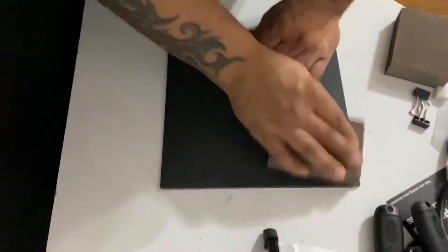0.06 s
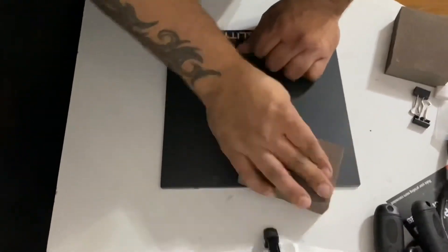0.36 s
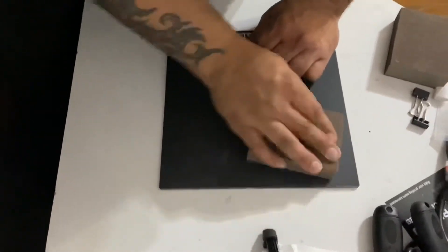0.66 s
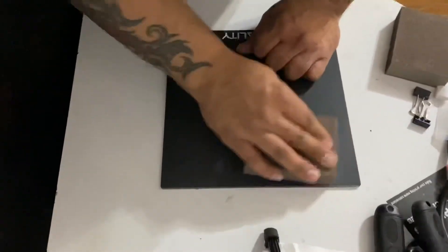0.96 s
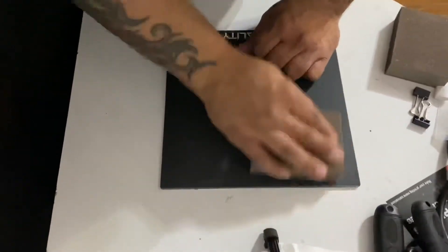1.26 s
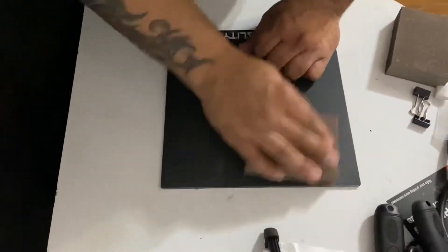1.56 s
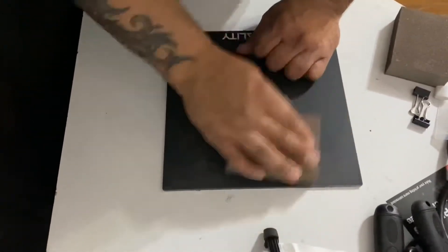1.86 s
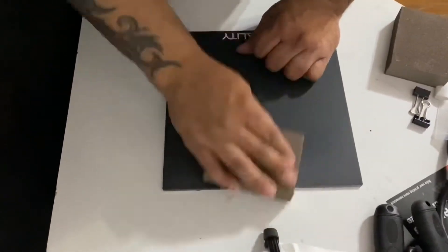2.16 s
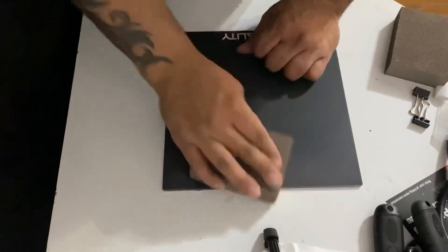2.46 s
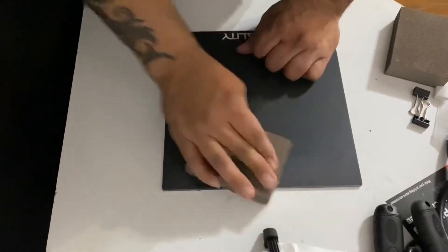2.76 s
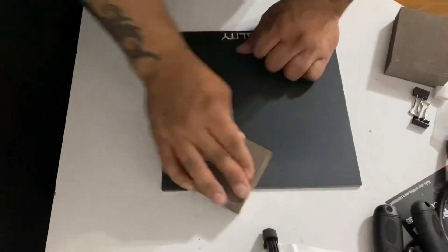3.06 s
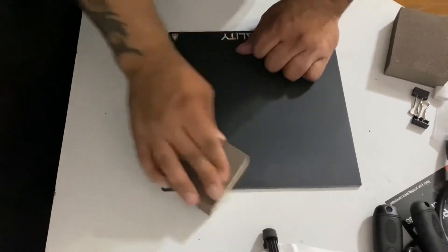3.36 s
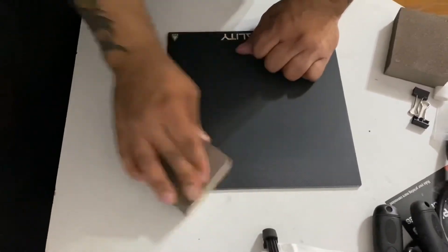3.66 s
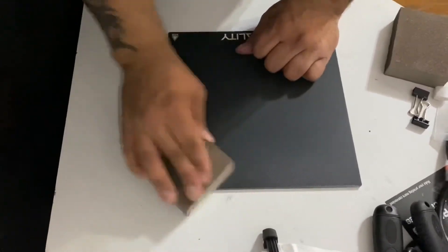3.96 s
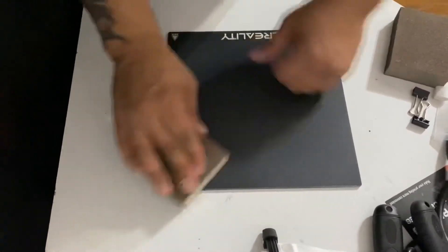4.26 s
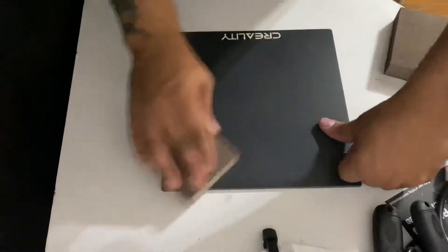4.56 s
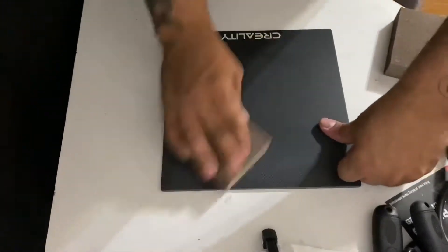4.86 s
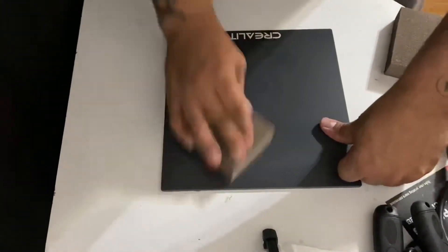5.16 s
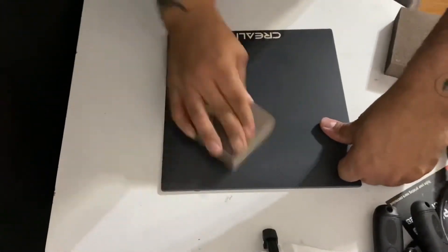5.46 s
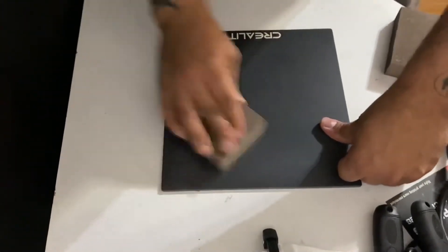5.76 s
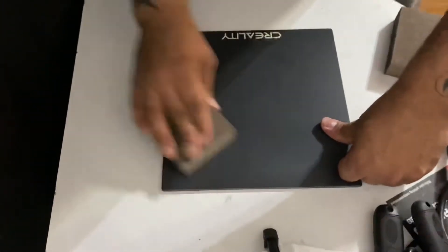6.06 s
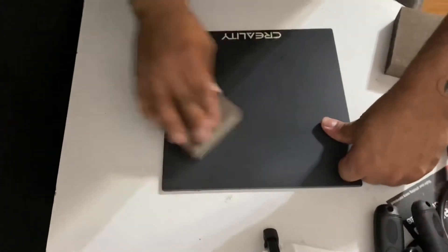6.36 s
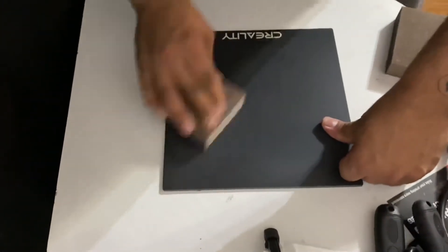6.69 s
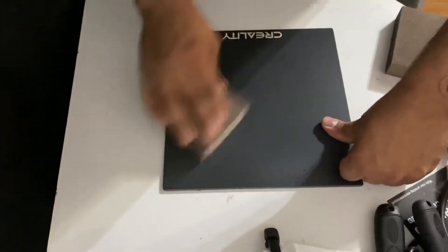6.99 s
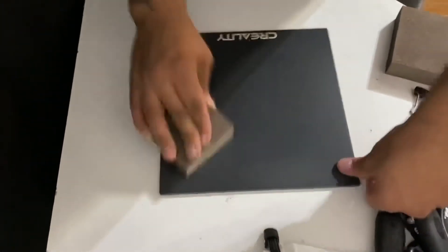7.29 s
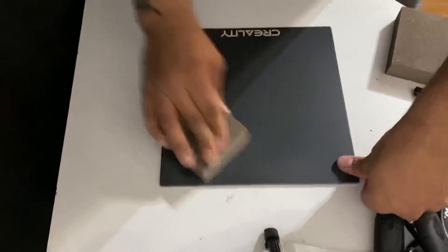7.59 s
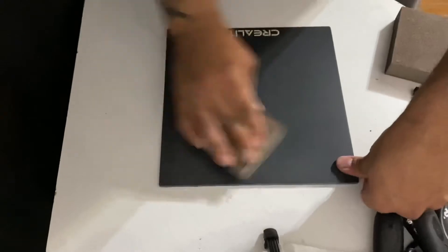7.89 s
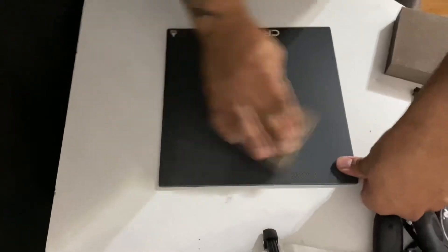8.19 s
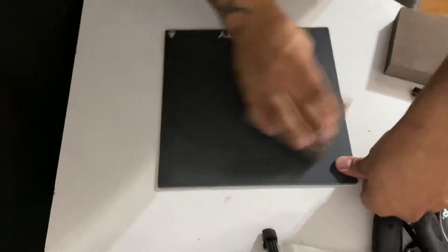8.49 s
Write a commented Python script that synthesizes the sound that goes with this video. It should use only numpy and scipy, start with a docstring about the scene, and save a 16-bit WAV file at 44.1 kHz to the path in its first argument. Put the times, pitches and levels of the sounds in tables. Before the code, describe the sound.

A fine sanding sponge scrubs a glass plate on a table, heard close up in a small room. Quick back-and-forth strokes hiss and make the glass ring with a rasp, with short rough chirps on the way back. After a second the strokes slow a little. The table rumbles faintly, and dull knocks come now and then. Near the end there is a cluster of bumps and a tiny squeak while the sanding continues.

```python
"""A fine sanding sponge scrubs back and forth over a glass plate on a table. From the start its grit
hisses and rings the glass, the sponge sticks and slips with a chirp on the way back, and the table
rumbles under the arm. Around one second the strokes slow into ovals, and knocks begin to come from the
judder and the other hand. By four seconds the sponge has crossed from right to left.
Just after seven seconds the other hand changes grip, with a cluster of bumps and a short squeak."""
import sys
import numpy as np
from scipy import signal
from scipy.fft import rfft, irfft, next_fast_len
from scipy.io import wavfile
from scipy.ndimage import uniform_filter1d, map_coordinates

SR = 44100
rng = np.random.default_rng(int(sys.argv[2]) if len(sys.argv) > 2 else 0)


def store_wav(level_fs):
    """Save 16-bit WAV to argv[1]."""
    pcm = np.round(np.clip(np.atleast_2d(level_fs), -1, 1) * 32767)
    wavfile.write(sys.argv[1], SR, pcm.T.astype(np.int16))


N = 384993

# Levels in the tables are relative: each sound's function sets its final loudness.
# forward strokes, five a second, then about three and a half: (middle [s], length [s], hiss level [dB])
FORWARD_STROKES = [(0.112, 0.058, -31.5), (0.303, 0.052, -31), (0.495, 0.06, -31), (0.706, 0.072, -33),
                   (0.965, 0.1, -34.5), (1.25, 0.1, -33), (1.529, 0.12, -33.5), (1.833, 0.115, -33),
                   (2.108, 0.11, -33.5), (2.392, 0.11, -33.5), (2.68, 0.12, -32.5), (2.955, 0.113, -33),
                   (3.255, 0.12, -34), (3.555, 0.13, -35), (3.849, 0.13, -33), (4.113, 0.1, -39.5),
                   (4.385, 0.089, -36.5), (4.67, 0.096, -34.5), (4.968, 0.13, -34.5), (5.242, 0.13, -34),
                   (5.536, 0.12, -34), (5.8, 0.083, -32.5), (6.067, 0.08, -34), (6.38, 0.13, -35.5),
                   (6.676, 0.14, -35), (6.95, 0.13, -36), (7.271, 0.24, -50), (7.51, 0.088, -37.5),
                   (7.617, 0.04, -43), (7.785, 0.076, -40), (8.084, 0.2, -36), (8.362, 0.14, -36),
                   (8.63, 0.1, -35.5)]
# lighter strokes back, on which the sponge judders:
# (middle [s], hiss level [dB], judder level [dB], plate jolt level [dB], half length of judder [s])
RETURN_STROKES = [(0.008, -35, -32, -46, 0.014), (0.203, -35, -33, -45.5, 0.017),
                  (0.395, -34.5, -33, -41.5, 0.013), (0.59, -34.5, -33, -43, 0.019),
                  (0.828, -41.5, -34.5, -41.5, 0.017), (1.081, -43, -34.5, -59, 0.0069),
                  (1.36, -41, -36, -51, 0.019), (1.655, -46, -41, -49, 0.018),
                  (1.96, -41.5, -36, -49, 0.018), (2.241, -37.5, -36, -47, 0.015),
                  (2.523, -37, -36.5, -53, 0.016), (2.81, -37, -37.5, -54, 0.015),
                  (3.109, -39, -35, -49.5, 0.017), (3.401, -40, -39.5, -51, 0.019),
                  (3.696, -41, -36.5, -60, 0.016), (3.991, -46, -37.5, -62, 0.019),
                  (4.268, -48, -38, -50, 0.013), (4.533, -43, -42, -60, 0.027),
                  (4.8, -46, -41.5, -50, 0.014), (5.33, -46, -43, -53, 0.012),
                  (5.953, -38, -37.5, -52, 0.02), (6.228, -39, -36.5, -49, 0.015),
                  (6.77, -49, -47, -66, 0.037)]
# moving in ovals, the sponge keeps sliding between strokes: (time [s], hiss level [dB])
GLIDE_LEVEL = [(0.0, -42), (0.55, -41), (1.0, -36.5), (2.0, -35.5), (3.5, -36), (4.12, -35), (4.2, -43),
               (4.48, -38.5), (4.75, -35), (5.7, -34), (5.88, -36.5), (6.2, -36), (6.5, -34), (7.0, -33.5),
               (7.11, -36.5), (7.3, -33.5), (7.43, -34), (7.5, -35), (7.7, -33), (8.73, -34)]
# where the sponge works: (time [s], place [0 right edge to 1 left edge])
SPONGE_PLACE = [(0, 0.027), (1.8, 0.048), (2.5, 0.36), (3.4, 0.65), (4.2, 0.91), (6.9, 1), (7.8, 0.8),
                (8.73, 0.9)]
# the tone of grit on glass: (frequency [Hz], level [dB])
GRIT_SPECTRUM = [(100, -30), (300, -30), (700, -15), (1300, -3), (3200, -1.5), (5500, -1), (7600, 0.83),
                 (10400, 0.5), (11900, 0.5), (12500, 2.5), (13300, 0.8), (15500, -.5)]
# the hiss changes colour as the sponge travels: (time [s], high treble over the rest [dB])
HISS_BRIGHTNESS = [(0, -1.5), (.7, -3.5), (1.0, -3), (2.2, -2), (2.9, -1), (3.6, 2.2), (4.1, -0.5),
                   (4.25, 11), (4.37, 2.5), (4.48, 8), (4.6, 2), (5.1, 1.2), (6.4, 1), (7.5, 0.8),
                   (8.73, -2.5)]
# how alike left and right are in the hiss, rasp and rumble: (frequency [Hz], likeness [0 to 1])
HISS_LIKENESS = [(200, 0.38), (1500, 0.039), (4200, 0.47), (5600, 0.055), (6900, 0.73), (8100, 0.7),
                 (8600, 1), (9450, 1), (10000, 0.63), (10600, 0.75), (11600, 1), (12200, 0.6), (13000, 1),
                 (13700, 1), (14150, 0.6), (14700, 1)]
RASP_LIKENESS = [(300, 0.22), (530, 0.39), (1000, 0.8), (1600, 0.12), (2400, 0.94)]
RUMBLE_LIKENESS = [(100, 0.95), (250, 0.7)]
# the plate's ringing notes, with the sponge in three places:
# (pitch [Hz], width [Hz], level at right edge [dB], level in middle [dB], level at left edge [dB])
PLATE_NOTES = [(305, 14, -13, -24, -20), (400, 24, -7, -24, -30), (437, 32, -17, -6, -1),
               (529.5, 32.6, -1.5, -4, 0.5), (700, 270, -15, -14, -7.5), (880, 67, -6.5, -5.5, -0.5),
               (986, 46, 3, 1.5, 2), (1128, 55, -4, -1, 1), (1228, 76, 2.5, -7.5, -9),
               (1352, 53, -3, 3.5, -3.5), (1626, 122, 1, 4, 0.8), (1790, 74, -4, 0, -3),
               (2008, 66, 1, -4, 3.2), (2166, 87, 1.5, 0.5, -5), (2415, 144, -10, 0, -3.5),
               (2620, 140, -11, 1.5, -3), (3040, 560, -8.5, -23, -9.5)]
# the plate's rasp at a middling sliding speed: (time [s], level [dB])
RASP_LEVEL = [(0.0, -35.5), (0.9, -35.5), (1.4, -35.5), (1.8, -37), (2.4, -36), (3.2, -38), (3.6, -38.5),
              (3.9, -38), (4.2, -44), (4.4, -44.5), (4.55, -39.5), (5.0, -39), (5.35, -37.5), (5.5, -38.5),
              (5.65, -38), (5.82, -39), (5.92, -39), (6.8, -38), (7.12, -41.5), (7.35, -39), (7.7, -39.5),
              (8.0, -37), (8.73, -38)]
# coarse grit catches and scrapes the plate harder: (time [s], change in rasp [dB])
GRIT_SCRAPES = [(.197, 4.5), (.73, 2.5), (.82, 2), (1.22, 0), (3.02, 6), (3.11, 4), (4.67, -0.5),
                (4.94, 1.5), (5.46, 0), (5.52, 3.5), (5.88, 5), (5.95, 3), (6.21, 5.5), (6.69, 3.5),
                (7.985, 2.5), (8.42, 1.5)]
# the arm keeps the table trembling: (time [s], level [dB])
SHAKE_LEVEL = [(0, -46), (.8, -48), (1.2, -55), (2.2, -50.5), (3, -54.5), (4, -54.5), (4.9, -53),
               (5.5, -55.5), (6.1, -47), (6.9, -45.5), (7.35, -43.5), (7.9, -56), (8.2, -43.5), (8.73, -45)]
# the tone of the shaken table, the quiet room and the jolted plate: (frequency [Hz], level [dB])
RUMBLE_SPECTRUM = [(20, -29), (40, -3), (60, 5), (95, -2), (135, 0.5), (175, -13.5), (300, -13), (600, -35),
                   (2000, -69)]
ROOM_SPECTRUM = [(20, -27), (60, -1), (130, 6), (250, -16), (1000, -18), (15000, -48)]
JOLT_SPECTRUM = [(60, -23), (220, -8.5), (400, -1.5), (530, 2), (680, -8.5), (2000, -34.0)]
# harder shoves rock the table: (time [s], level [dB], centre frequency [Hz])
ARM_SHOVES = [(.05, -46.5, 89), (.24, -48, 89), (.44, -44, 88), (0.62, -45, 100), (4.346, -43, 65),
              (5.659, -46.5, 100), (5.931, -44, 65), (6.239, -43, 85), (6.56, -42, 61.7), (7.391, -41, 75),
              (8.229, -44, 54.5), (8.5, -43.5, 92)]
# short knocks ring the plate and table, from hand bumps and the sponge's judder:
# (time [s], level [dB], frequency rung hardest [Hz])
PLATE_KNOCKS = [(0.826, -46, 400), (1.16, -39, 530), (1.351, -37, 261), (1.455, -44, 261),
                (4.301, -30, 416), (4.31, -24, 129), (4.324, -32, 380), (4.487, -22.5, 90),
                (4.489, -36, 445), (5.922, -35, 500), (6.189, -33, 504), (6.305, -36.5, 506),
                (6.61, -35, 460), (6.915, -40, 480), (7.283, -29, 1000), (7.285, -27, 240),
                (7.292, -27, 135), (7.301, -28, 1000), (7.301, -23.5, 190), (7.309, -33, 560),
                (7.372, -30, 151), (7.41, -31, 140), (7.458, -35, 220), (7.486, -36.5, 230),
                (8.075, -37, 270), (8.565, -35, 500)]
# the table top's ringing notes: (pitch [Hz], level [dB], time to fade by 60 dB [s])
TABLE_NOTES = [(63.3, 2.5, 0.29), (106, 0, 0.082), (134, -0.5, 0.12), (186, -8.5, 0.12), (244, -3.5, 0.15),
               (307, -2.5, 0.125), (365, -6, 0.083), (449, -2.5, 0.11), (538, -1, 0.1), (915, -4, 0.046),
               (1105, -5, 0.084)]
# in the treble, left and right swing in and out of step: (frequency [Hz], lead of the left [radians])
LEFT_LEAD = [(20, 0), (3200, .5), (5000, 0), (7200, -.05), (7900, -1), (8450, -3.1), (9500, -3.17),
             (10500, -6.2), (11650, -6.35), (12800, -9.38), (13720, -9.46), (14600, -12.5), (16000, -12.6)]


def amp(db):
    """Turn decibels into a number to multiply by."""
    return 10 ** (np.asarray(db) / 20)


def unit(x):
    """Scale a signal to an average power of 1."""
    return x / np.sqrt(np.mean(x ** 2) + 1e-20)


def along(points, hz):
    """Read between (frequency, value) points, with octaves evenly spaced."""
    freqs, values = np.transpose(points)
    return np.interp(np.log(hz + 1), np.log(freqs + 1), values)


def clock():
    """The time of each sample in seconds."""
    return np.arange(N) / SR


def curve(points):
    """Join (time, value) points with straight lines."""
    return np.interp(clock(), *np.transpose(points))


def wobble(per_second):
    """A smooth curve through this many random values a second."""
    return map_coordinates(rng.standard_normal(int(N * per_second / SR) + 4), [clock() * per_second])


def filtered(x, response):
    """Scale or delay each frequency in x as response(hz) says."""
    size = next_fast_len(N + SR // 2)
    return irfft(rfft(x, size) * response(np.fft.rfftfreq(size, 1 / SR)), size)[..., :N]


def coloured(x, spectrum):
    """Give x the tone of a (frequency, level) table."""
    return filtered(x, lambda hz: amp(along(spectrum, hz)))


def spread(pair, likeness):
    """Mix two unrelated signals into a left and right that are partly alike."""
    angle = lambda hz: np.arccos(np.clip(along(likeness, hz), -1, 1)) / 2
    mid, side = filtered(pair, lambda hz: np.array([np.cos(angle(hz)), np.sin(angle(hz))]))
    return unit(np.array([mid + side, mid - side]))


def swell(middle, length, squareness=3.06):
    """One push rises, holds and falls, staying above half height for length seconds."""
    out = np.zeros(N)
    near = np.arange(max(0, int((middle - 2 * length) * SR)), min(N, int((middle + 2 * length) * SR)))
    out[near] = .5 ** (np.abs(2 * (near / SR - middle) / length) ** squareness)
    return out


def stroke_level(return_s=0.05, turn_s=0.031, turn_db=1.03):
    """The hiss level in dB: it swells with each stroke and dips where the hand turns round."""
    strokes = list(FORWARD_STROKES) + [(s, return_s, db) for s, db, *_ in RETURN_STROKES]
    power = amp(curve(GLIDE_LEVEL)) ** 2 + sum(amp(db) ** 2 * swell(s, length) for s, length, db in strokes)
    turns = sum(swell(s + 0.72 * length, turn_s) for s, length, _ in FORWARD_STROKES)
    return 10 * np.log10(power) - turn_db * turns


def scratches(per_second, rubbing, uneven_db=0.5):
    """Two streams of tiny grit hits of uneven size, over smooth rubbing noise."""
    hits = rng.random((2, N)) < per_second / SR
    sizes = rng.standard_normal((2, N)) * amp(uneven_db * rng.standard_normal((2, N)))
    return unit(unit(hits * sizes) + rubbing * rng.standard_normal((2, N)))


def clumps(x, depth_db, above_hz=560):
    """Clumps of grit catch and let go, briefly lifting narrow bands; the low notes stay even."""
    hz, _, bands = signal.stft(x, SR, nperseg=1024)
    patches = uniform_filter1d(rng.standard_normal(bands.shape[1:]), size=4, axis=0)  # blur in pitch
    patches = uniform_filter1d(patches, size=6, axis=1)  # and in time
    reach = 1 / (1 + (above_hz / (hz[:, None] + 1)) ** 4)
    return signal.istft(bands * amp(depth_db * reach * unit(patches)), nperseg=1024)[1][:, :N]


def grit_hiss(speed_db, split_hz=7000):
    """Grit hisses on glass; each stroke bites coarsely at first and ends brighter."""
    t = clock()
    progress = sum((t - s) / length * swell(s, 1.9 * length) for s, length, _ in FORWARD_STROKES)
    stall_db = 0.82 * np.minimum(speed_db + 3, 0)  # a stalling sponge sounds duller
    bright_db = curve(HISS_BRIGHTNESS) + 2 * progress + stall_db
    grit = clumps(scratches(per_second=12000, rubbing=1.7), depth_db=2.0)
    grit = spread(coloured(grit, GRIT_SPECTRUM), HISS_LIKENESS)
    fine = filtered(grit, lambda hz: 1 / (1 + (split_hz / (hz + 1)) ** 8))
    coarse = (grit - fine) * amp([[.6], [-.6]])  # a little to the left
    return fine * amp(.5 * bright_db + 1.12) + coarse * amp(0.2 * speed_db - .5 * bright_db + 0.29)


def bent(x, pitch_share=0.012, per_second=7):
    """The moving hand weighs on the plate and bends its notes up and down."""
    position = np.cumsum(1 + pitch_share * wobble(per_second))
    return np.array([map_coordinates(channel, [position], order=3, mode="mirror") for channel in x])


def plate_rasp():
    """Coarse grit rings the plate; which notes are strong depends on where the sponge is."""
    place = np.clip(curve(SPONGE_PLACE) + 0.1 * wobble(7), 0, 1)
    rasp = clumps(scratches(per_second=4000, rubbing=0.67), depth_db=3.0)
    rasp = spread(rasp, RASP_LIKENESS)
    pitches, widths, *levels_by_place = np.transpose(PLATE_NOTES)
    grid_hz = np.geomspace(20, SR / 2, 2000)
    peaks = 1 / (1 + ((grid_hz[:, None] ** 2 - pitches ** 2) / (widths * grid_hz[:, None])) ** 2)
    out = 0
    for spot, db in enumerate(levels_by_place):  # right, middle, left
        response = np.sqrt(peaks @ amp(db) ** 2)
        nearness = np.maximum(1 - np.abs(2 * place - spot), 0)
        out = out + nearness * unit(filtered(rasp, lambda hz: np.interp(hz, grid_hz, response)))
    return bent(out) * amp([[.8], [-.8]])


def sanding(middling_db=-33, scrape_s=0.047):
    """Faster sliding makes the hiss much louder and the plate's rasp a little louder."""
    hiss_db = stroke_level()
    speed_db = hiss_db - middling_db  # 0 at a middling sliding speed
    scrape_db = sum(db * swell(s, scrape_s) for s, db in GRIT_SCRAPES)
    rasp_db = curve(RASP_LEVEL) + 0.17 * speed_db + scrape_db
    grip_db = 0.36 * wobble(70) + 0.081 * wobble(300)  # the foam grips unevenly
    catch_db = 0.64 * wobble(36)  # coarse grit catches now more, now less
    hiss = grit_hiss(speed_db) * amp(hiss_db + 3.6 + grip_db)
    return hiss + plate_rasp() * amp(rasp_db - 0.77 + grip_db + catch_db)


def rumble():
    """The table shakes under the arm, over faint room noise and mains hum."""
    noise = lambda spectrum: spread(coloured(rng.standard_normal((2, N)), spectrum), RUMBLE_LIKENESS)
    hum = amp(-64.5) * np.sin(2 * np.pi * 60 * clock())
    hum += amp(-70.0) * np.sin(2 * np.pi * 240 * clock()) * amp(3.8 * wobble(6))
    shake = amp(curve(SHAKE_LEVEL) - 2.0) * noise(RUMBLE_SPECTRUM)
    return shake + amp(-58.5) * noise(ROOM_SPECTRUM) + hum


def judder(right_hz=1053, left_hz=928):
    """The sponge's edge sticks and slips unsteadily: a short, rough chirp that also jolts the plate."""
    out, t = np.zeros((2, N)), clock()
    unsteady_time = np.cumsum(1 + .095 * wobble(420)) / SR
    roughness = amp(2.2 * wobble(330))
    jolt = coloured(rng.standard_normal(N), JOLT_SPECTRUM)
    for s, _, db, jolt_db, half_s in RETURN_STROKES:
        near = np.abs(t - s) < .1
        slip_hz = right_hz + (left_hz - right_hz) * np.interp(s, *np.transpose(SPONGE_PLACE))
        phase = 2 * np.pi * slip_hz * unsteady_time[near] + np.array([[.15], [-.15]])
        chirp = amp(db + 2.0) * (np.sin(phase) + amp(-11.5) * np.sin(2 * phase))
        body = amp(jolt_db - 0.5) * (unit(jolt[near]) + amp(4) * np.sin(phase / 2))
        shape = np.exp(-.5 * ((t[near] - s) / half_s) ** 2)
        out[:, near] += shape * roughness[near] * (chirp + body)
    return out * amp([[.3], [-.3]])


def room_echo(x, fade_s):
    """A small room answers left and right each with its own short tail."""
    t = np.arange(SR // 3) / SR
    tail = rng.standard_normal((2, len(t))) * amp(-60 * t / fade_s) * (1 - np.exp(-t / 0.0014))
    return signal.fftconvolve(x, tail / np.linalg.norm(tail[0]), axes=1)[:, :N]


def shoves(length_s=0.063, band_ratio=1.66):
    """Each hard shove rocks the table in a short, low swell."""
    out, t = np.zeros(N + SR), np.arange(SR // 2) / SR
    for s, db, hz in ARM_SHOVES:
        start = max(0, round(s * SR) - len(t) // 2)
        band = signal.butter(3, [hz / band_ratio, hz * band_ratio], "bandpass", fs=SR, output="sos")
        shape = .5 ** ((2 * (t + start / SR - s) / length_s) ** 2)
        rock = signal.sosfilt(band, rng.standard_normal(len(t))) * np.sqrt(shape)
        out[start:][:len(t)] += amp(db) * unit(rock) * np.sqrt(shape.mean())
    return out[:N]


def knocks(narrowness=2.5, rise_cycles=0.4):
    """Knocks ring the table: soft ones pick low notes and rise slowly, hard ones pick high and click."""
    out, t = np.zeros(N + SR), np.arange(SR // 3) / SR
    for s, db, contact_hz in PLATE_KNOCKS:
        ring = 0
        for hz, note_db, fade_s in TABLE_NOTES:
            share = 1 / (1 + (narrowness * (hz / contact_hz - contact_hz / hz)) ** 2)
            fade = amp(note_db + rng.normal(0, 1) - 60 * t / fade_s)
            ring += share * fade * np.sin(2 * np.pi * hz * (1 + rng.normal(0, 0.024)) * t)
        dull = signal.butter(2, min(2.6 * contact_hz, SR / 3), fs=SR)
        click = signal.lfilter(*dull, rng.standard_normal(len(t))) * amp(4.0 - 60 * t / 0.061)
        rise = 1 - np.exp(-t * contact_hz / rise_cycles)
        out[round(s * SR):][:len(t)] += amp(db) * (ring + click) * rise
    return out[:N]


def squeak(start_s=7.28, length_s=0.027, pitch_hz=4540):
    """The thumb skids on the glass with a brief, rough, high squeak that fades."""
    progress = np.clip((clock() - start_s) / length_s, 0, 1)
    phase = 2 * np.pi * np.cumsum(pitch_hz * (1 + 0.011 * wobble(800))) / SR
    return amp(-28 - 4.5 * progress) * np.abs(np.sin(np.pi * progress)) ** .5 * np.sin(phase)


def scene():
    """All the sounds together; only the judder and knocks echo in the room."""
    contacts = judder() + knocks()
    return sanding() + contacts + amp(-8) * room_echo(contacts, fade_s=0.16) + squeak() + shoves() + rumble()


def record(dry, top_hz=15750):
    """Shift left and right out of step in parts of the treble, and cut the very highest sound."""
    shift = lambda hz: np.exp(.5j * along(LEFT_LEAD, hz) * np.array([[1], [-1]]))
    return filtered(dry, lambda hz: shift(hz) * (hz < top_hz))


dry = scene()
out = record(dry)
store_wav(out)
```